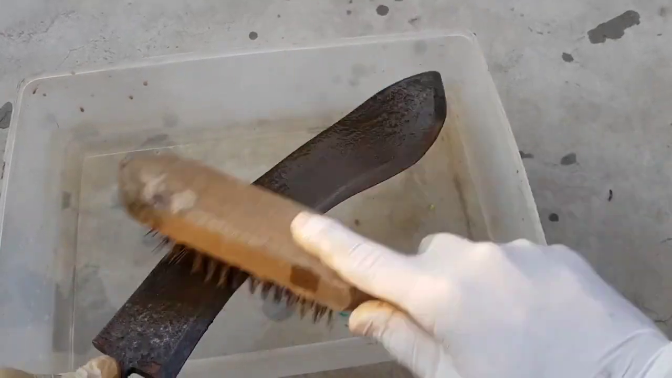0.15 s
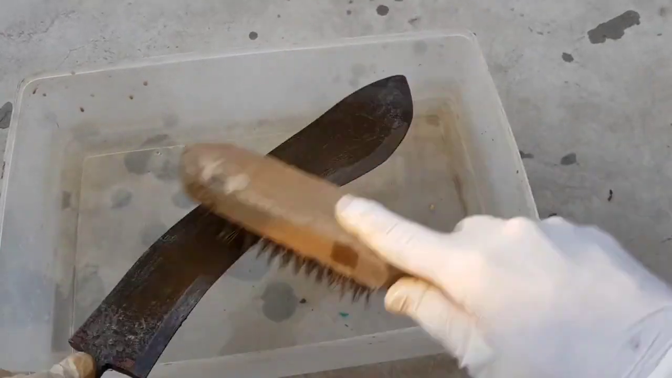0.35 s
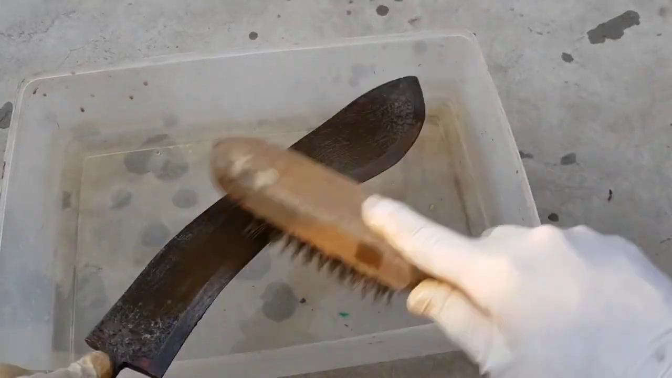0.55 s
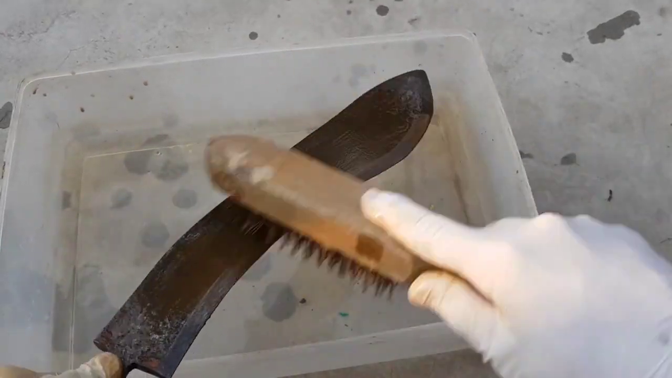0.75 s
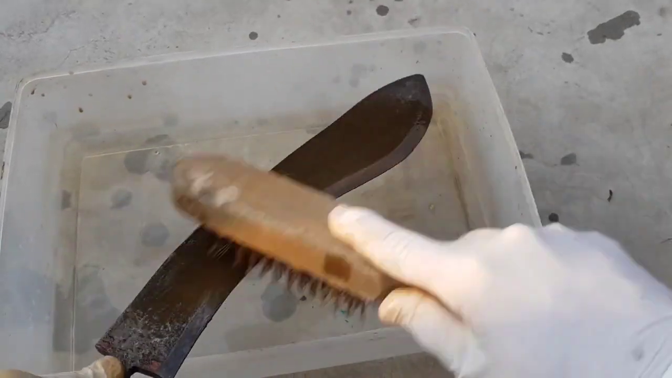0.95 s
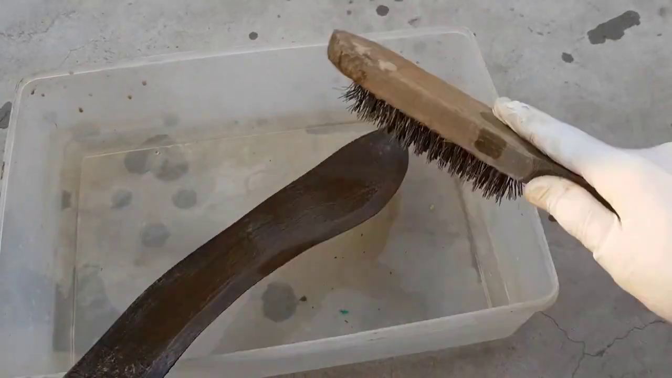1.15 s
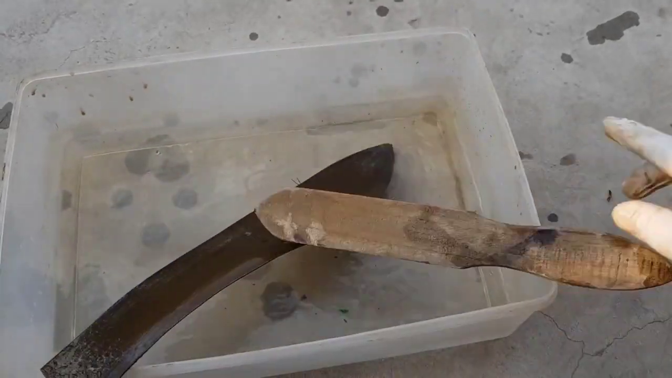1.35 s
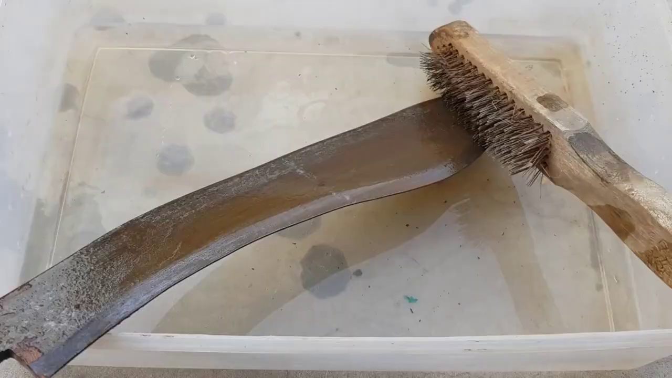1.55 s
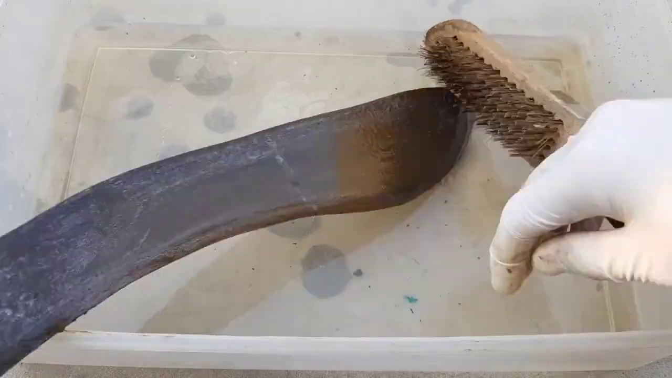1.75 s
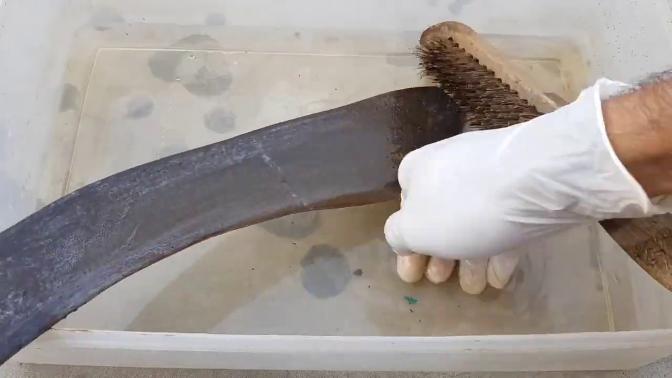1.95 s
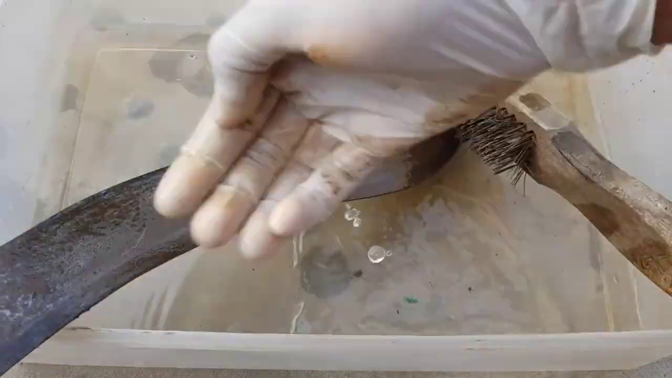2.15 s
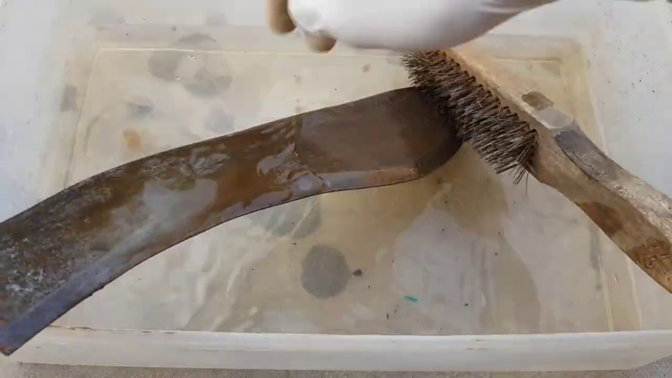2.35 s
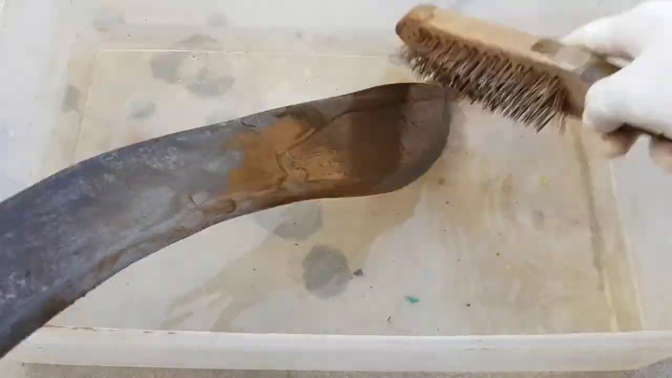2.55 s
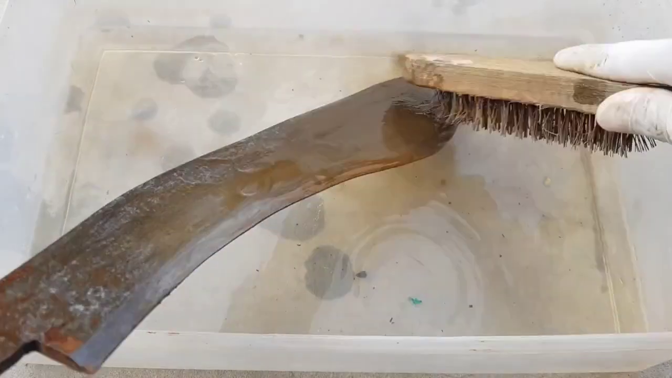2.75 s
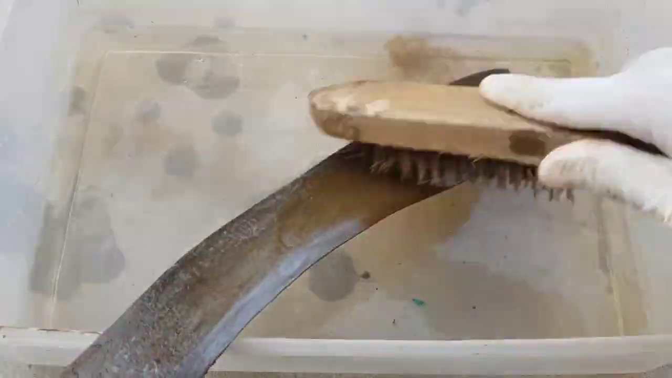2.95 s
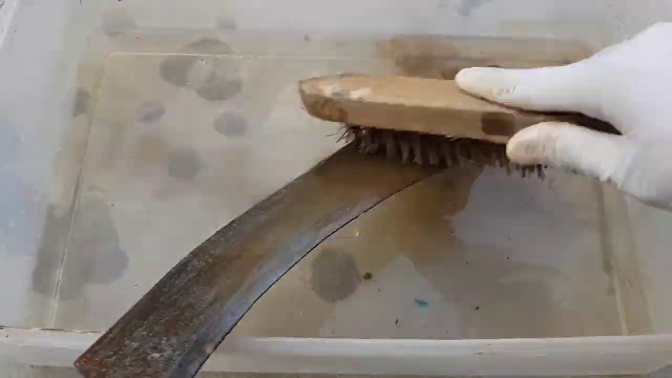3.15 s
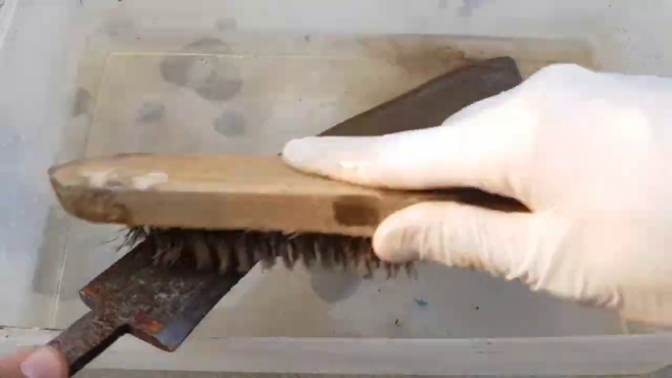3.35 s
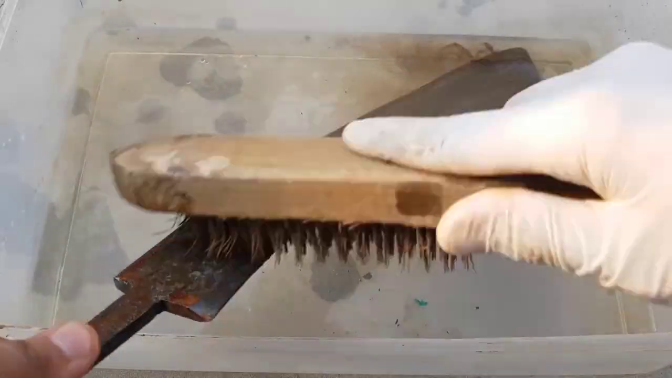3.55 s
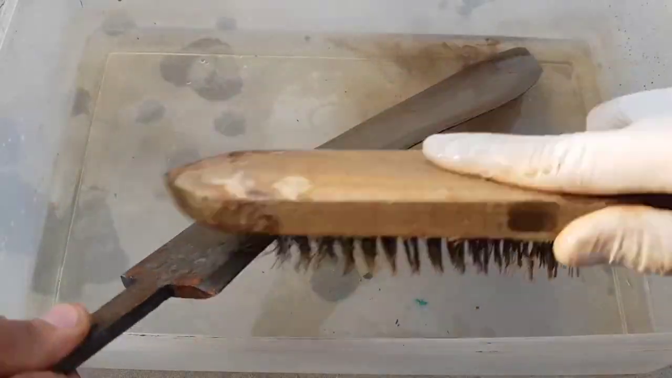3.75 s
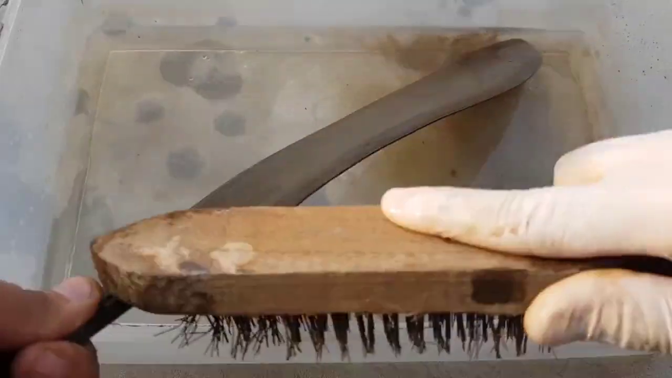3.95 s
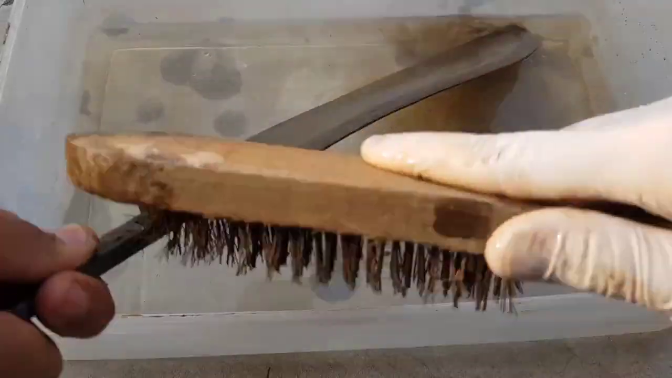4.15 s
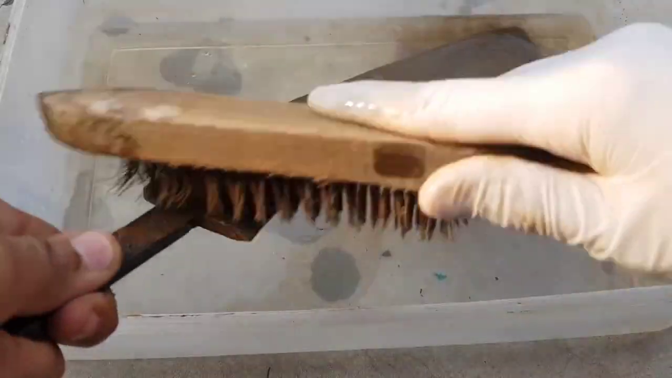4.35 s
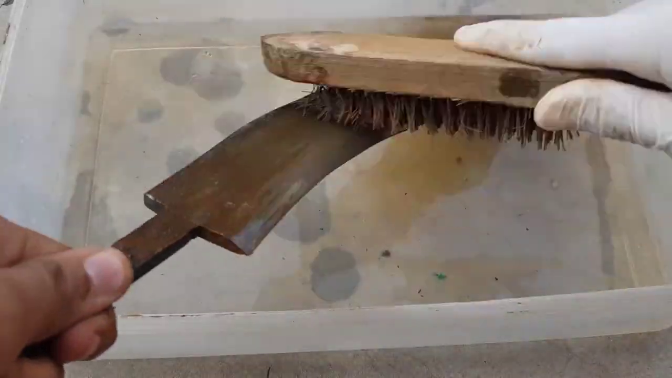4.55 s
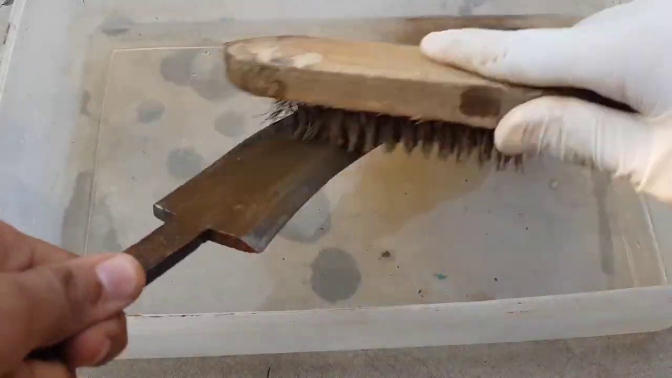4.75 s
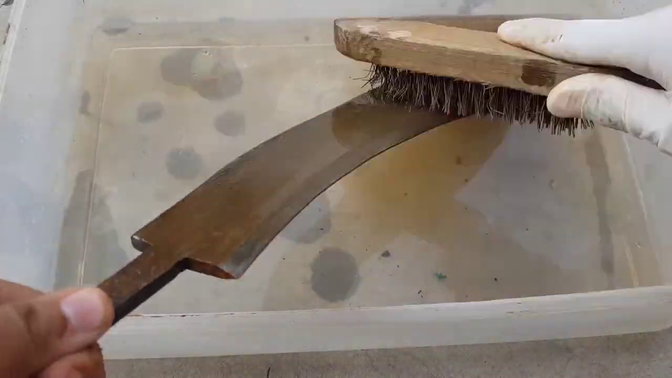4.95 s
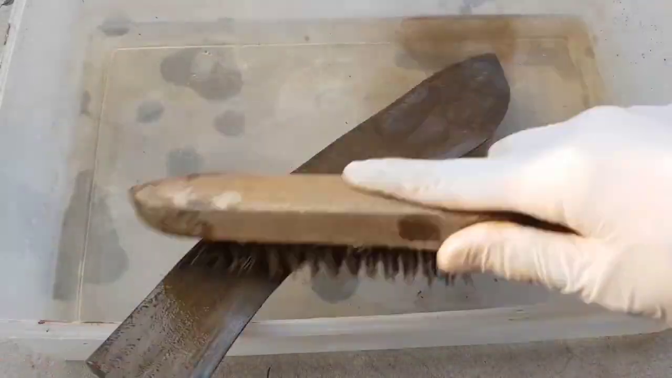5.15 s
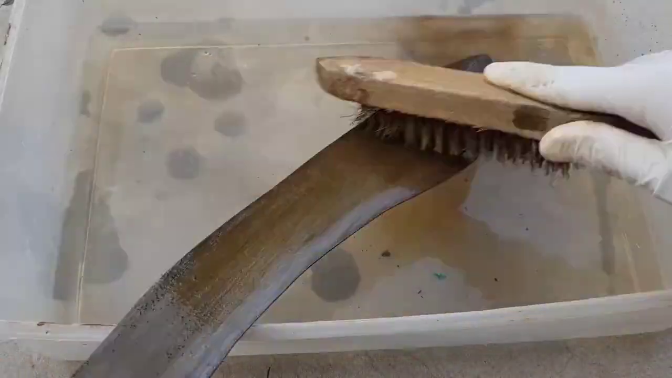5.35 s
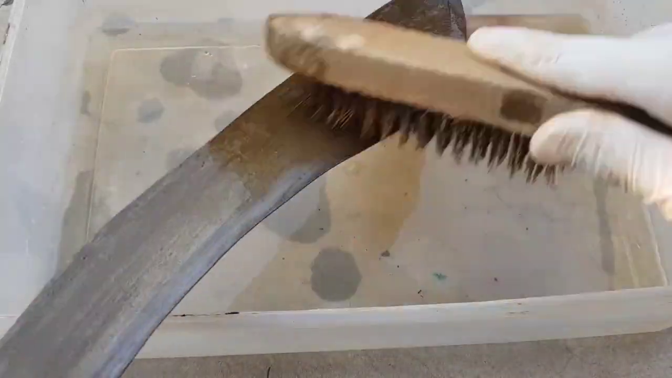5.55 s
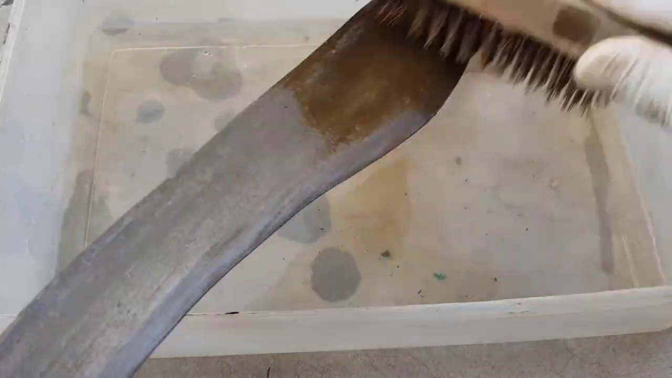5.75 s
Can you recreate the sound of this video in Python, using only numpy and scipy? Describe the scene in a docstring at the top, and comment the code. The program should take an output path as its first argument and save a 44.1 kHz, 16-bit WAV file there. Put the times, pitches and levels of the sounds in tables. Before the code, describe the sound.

Close stereo sound of a steel wire brush scrubbing a rusty blade resting in a plastic tub. Quick rasping strokes run for just over a second, then the brush is put down with hollow knocks. A quiet pause holds soft glove rustles and a barely audible water trickle. Scrubbing resumes, breaks briefly for rustles and knocks near four seconds, then carries on to the end over a faint low murmur.

```python
"""A steel wire brush scrubs a wet rusty blade whose tip rests in a plastic tub, close to a stereo microphone.
First come quick strokes: wire tips tick over rust and ring the blade; pressure rumbles in the tub.
In a pause the brush is laid down, a gloved hand wets the blade with a faint trickle, the brush is taken up.
It scrubs again, rustles and knocks through a short pause, and scrubs to the end.
Ticks are random clicks, blade and tub are ringing modes; a low murmur of filtered noise lies below."""
import sys
import numpy as np
from scipy import signal
from scipy.fft import rfft, irfft, next_fast_len
from scipy.io import wavfile
from scipy.ndimage import uniform_filter1d

SR = 44100
rng = np.random.default_rng(int(sys.argv[2]) if len(sys.argv) > 2 else 0)


def unload_wav(signal):
    """Save mono or channel-first audio to the path in sys.argv[1] as 16-bit WAV at rate SR, clipped to [-1, 1]."""
    wavfile.write(
        sys.argv[1],
        SR,
        np.round(np.clip(np.atleast_2d(signal).T, -1, 1) * 32767).astype(np.int16),
    )


N = 259749

# How the blade is held:
# (t/s, blade ring against scrape/dB, centre of the rub/Hz, coarse grit/dB, dry scratch/dB)
GRIP_OVER_TIME = [(.5, -46, 1040, -20, 2.5), (1.18, -39, 880, -35, -3), (1.25, -10.5, 633, 16.5, 2),
                  (2.0, -12.5, 814, 3.5, 5.5), (2.7, -12, 484, 7, 0.5), (3.9, -10, 560, 3.5, 4),
                  (4.02, -16, 593, 10.5, 2), (4.21, -27, 560, 12, -3), (4.35, -12.5, 600, 5.5, 0),
                  (5.0, -11, 746, -2.5, 4), (5.25, -25, 442, -2.5, -4), (5.5, 1, 680, 15, 7)]


def from_db(db):
    """Turn decibels into gain."""
    return 10 ** (np.asarray(db) / 20)


def rms_one(x):
    """Scale a sound to an rms level of 1."""
    return x / np.sqrt(np.mean(x ** 2) + 1e-20)


def in_time(rows):
    """Draw each column of a table as a curve over time, with straight lines between its rows."""
    s, *columns = np.transpose(rows)
    return [np.interp(np.arange(N) / SR, s, column) for column in columns]


def at_hz(points, hz):
    """Read a level from a spectrum table, with frequency on a log axis."""
    table_hz, table_db = np.array(points)[:, 0], np.array(points)[:, 1]
    return np.interp(np.log(hz), np.log(table_hz), table_db)


def drift(rate):
    """A slow random curve of rms 1; a higher rate makes it wander faster."""
    # computed at every 20th sample, after a run-in that is thrown away
    r = np.exp(-40 * np.pi * rate / SR)
    noise = rng.standard_normal(N // 20 + 2002)
    slow = rms_one(signal.lfilter([1], [1, -2 * r, r * r], noise)[2000:])
    return np.interp(np.arange(N) / 20, np.arange(len(slow)), slow)


def ring(x, hz, t60):
    """A unit click sets off a sine of height 1 that dies by 60 dB in t60 seconds."""
    r = from_db(-60 / (t60 * SR))
    w = 2 * np.pi * hz / SR
    return signal.lfilter([0, np.sin(w)], [1, -2 * r * np.cos(w), r * r], x + 1e-18)


def ticks(per_s, spread_db):
    """Random contacts of uneven size; mid and side share the moments, not the wave."""
    happens = rng.random(N) < per_s / SR
    sizes = from_db(spread_db * np.minimum(rng.exponential(1, N), 4))
    return rms_one(sizes * happens * rng.standard_normal((2, N)))


def coloured(sources, spectrum, patchy_db, rate):
    """Quarter-octave bands, each with its own flicker; neighbours are fed by unrelated sources."""
    lowest, highest = spectrum[0][0], spectrum[-1][0]
    edges = np.geomspace(lowest, highest, round(4 * np.log2(highest / lowest)))
    out = 0
    for k, (low, high) in enumerate(zip(edges, edges[1:])):
        band_filter = signal.butter(2, [low, high], "band", fs=SR, output="sos")
        band = signal.sosfilt(band_filter, sources[k % 2])
        level_db = at_hz(spectrum, np.sqrt(low * high))
        out = out + band * from_db(level_db + patchy_db * drift(rate))
    return rms_one(out)


def blows(events):
    """Place one click for each event, given as (s, dB)."""
    clicks = np.zeros(N)
    clicks[[round(e[0] * SR) for e in events]] = from_db([e[1] for e in events])
    return clicks


def brush(rust, wires):
    """Dense ticks: a duller scrape over the rust, a bright hiss of wire tips, the ring of the blade."""
    # colour of the scrape over rust: (f/Hz, level per Hz/dB)
    rust_colour = [(900, -54.5), (1600, -14), (2600, -7.5), (3300, -7), (4400, -0.5), (6300, 5.5),
                   (8000, -23.5)]
    # colour of the wire-tip hiss: (f/Hz, level per Hz/dB)
    wire_colour = [(4500, -77), (6500, -2), (8300, 8), (10800, 4.5), (16000, 9)]
    # ringing tones of the blade: (f/Hz, width/Hz, level/dB)
    blade_tones = [(4840, 130, 0), (5060, 200, -1), (8150, 200, -1), (9400, 250, -4), (12500, 250, -3),
                   (14100, 250, -2)]
    ring_db, _, grit_db, scratch_db = in_time(GRIP_OVER_TIME)
    tufts = from_db(1.3 * drift(45))   # tufts catch and let go together
    tips = [ticks(18000, spread_db=1.8) for _ in range(2)]

    scrape = coloured(tips, rust_colour, patchy_db=2.2, rate=20)
    coarse = signal.sosfilt(signal.butter(2, 2400, fs=SR, output="sos"), scrape)
    scratch = signal.sosfilt(signal.butter(2, [2500, 4200], "band", fs=SR, output="sos"), scrape)
    scrape = scrape + (from_db(grit_db) - 1) * coarse + (from_db(scratch_db) - 1) * scratch

    hiss = wires * coloured(tips, wire_colour, patchy_db=2.3, rate=30)

    blade = 0
    for hz, width, db in blade_tones:
        t60 = np.log(1000) / np.pi / width   # a wider tone dies sooner
        tone = rms_one(ring(tips[0], hz, t60))
        blade = blade + from_db(db + 3.5 * drift(25)) * tone
    return tufts * (rust * (scrape + from_db(ring_db) * blade) + hiss)


def strokes():
    """Gains of rust, wires and tub load: each stroke swells from its turn and slows to the next."""
    # back-and-forth strokes: (push start t/s, pull start t/s, push level/dB, pull level/dB,
    # load on tub/dB, dip before the push/dB)
    back_and_forth = [(-.05, 0.002, -36, -25, -35, 17), (0.096, 0.158, -24.5, -29, -47, 16),
                      (0.189, 0.275, -26.5, -28.5, -45, 8), (0.283, 0.391, -26.5, -26, -52, 11),
                      (0.41, 0.483, -29.5, -33.5, -55, 5), (0.541, 0.608, -32, -27.5, -48.5, 0),
                      (0.614, 0.681, -25, -29, -47.5, 41), (0.722, 0.775, -24.5, -27.5, -46.5, 15),
                      (0.827, 0.913, -30.5, -28.5, -46, -0.5), (0.916, 0.977, -26, -27, -52.5, 19),
                      (1.019, 1.072, -24.5, -29, -49.5, 17), (1.137, 1.173, -31, -35, -52.5, -2),
                      (2.759, 2.87, -31, -26.5, -65, 34), (2.883, 2.934, -33, -34, -84, 5),
                      (2.96, 3.06, -33.5, -27, -47, 2.5), (3.023, 3.105, -34.5, -28, -37, 7.5),
                      (3.133, 3.216, -29.5, -25, -55, 17), (3.246, 3.321, -31.5, -26, -64, 7),
                      (3.371, 3.447, -33.5, -32.5, -61, 3.5), (3.494, 3.556, -31, -32, -54, 12),
                      (3.603, 3.67, -34, -29.5, -50.5, 0.5), (3.69, 3.757, -33.5, -26, -54, 5.5),
                      (3.754, 3.842, -39, -37.5, -62.5, -3), (3.878, 3.914, -32, -35.5, -65, 8),
                      (3.961, 4.031, -32, -45.5, -46, 6), (4.332, 4.335, -43, -34.5, -38.5, 0),
                      (4.382, 4.425, -30, -29.5, -44.5, 14), (4.468, 4.515, -29, -29.5, -46, 11),
                      (4.547, 4.626, -31, -27, -55.5, 5.5), (4.644, 4.704, -28, -28.5, -62, 24),
                      (4.736, 4.8, -29.5, -30.5, -52.5, 9), (4.834, 4.894, -31.5, -26.5, -59.5, 7),
                      (4.929, 5.005, -30.5, -30, -68, 7), (5.055, 5.108, -24.5, -31.5, -52.5, 6.5),
                      (5.192, 5.254, -36, -33.5, -54, -2), (5.313, 5.415, -32, -35.5, -51.5, 19),
                      (5.445, 5.53, -37.5, -37, -58, 3), (5.6, 5.653, -32.5, -34.5, -59.5, 12),
                      (5.713, 5.761, -28, -32, -63, 15), (5.82, 5.871, -26, -32, -52, 18)]
    # how the brush is angled: (t/s, wires over blade on a push/dB, share of a push spent speeding up [0-1],
    # share of a pull spent speeding up [0-1], dip before a pull/dB)
    angle = np.array([(0, 9.9, 0.45, 0.077, 7.3), (0.999, 11.9, 0.58, 0.79, 5.1),
                      (1.199, 11, 0.68, 0.22, 4.2), (2.803, 13, 0.34, 0.42, 6.5), (3.0, 3.7, 0.9, 0.13, 5),
                      (3.25, 7.1, 0.53, 0.26, 9.7), (3.5, 5.8, 0.69, 0.066, 10.5),
                      (3.7, 6.8, 0.65, 0.063, 26), (3.998, 0.87, 0.94, 0.18, 4.9),
                      (4.4, 2.1, 0.83, 0.67, 7.2), (4.7, 5.8, 0.65, 0.076, 8.9), (5.0, 7.3, 0.47, 0.1, 8.7),
                      (5.4, 7.2, 0.25, 0.13, 2.4), (5.75, 21.7, 0.32, 0.26, 8.9)])
    pull_wires_db, pull_load_db = 3.5, -21.5   # a pull is brighter and leans less on the tub
    lift_s, lift_db = 0.028, 30   # the last pull before a pause lasts this long and fades this far
    t, (rust, wires, load) = np.arange(N) / SR, np.zeros((3, N))

    # one row per stroke: turn s, share speeding up, level at the turn dB, level at speed dB, wires dB, load dB
    single = []
    for push, pull, push_db, pull_db, load_db, dip_db in back_and_forth:
        wires_db, push_up, pull_up, pull_dip_db = (
            np.interp(pull, angle[:, 0], column) for column in angle.T[1:])
        single.append((push, push_up, push_db - dip_db, push_db, wires_db, load_db))
        single.append((pull, pull_up, pull_db - pull_dip_db, pull_db,
                       wires_db + pull_wires_db, load_db + pull_load_db))

    following = single[1:] + [(np.inf,)]
    for (turn, speed_up, turn_db, speed_db, wires_db, load_db), after in zip(single, following):
        if after[0] - turn > .2:   # a pause follows
            end, end_db = turn + lift_s, speed_db - lift_db
        else:
            end, end_db = after[0], after[2]
        fastest = turn + np.clip(speed_up, .02, .95) * (end - turn)
        now = (t >= turn) & (t < end)
        swing = np.sin(np.interp(t[now], [turn, fastest, end], [0, np.pi / 2, np.pi]))
        rest = from_db(np.where(t[now] < fastest, turn_db, end_db))
        speed = rest + (from_db(speed_db) - rest) * swing
        share = 1 / np.sqrt(1 + from_db(2 * wires_db))   # rust and wires share the power
        rust[now] = speed * share
        wires[now] = speed * share * from_db(wires_db)
        load[now] = from_db(load_db) * (.15 + swing ** 2)
    return np.array([rust, wires, load])


def handling():
    """The same three gains for each rustle: it swells, runs unevenly and trails off."""
    # rustles of brush, glove and water in the pauses: (start t/s, loudest t/s, end t/s,
    # level/dB, treble over middle/dB, load on tub/dB)
    rustles = [(1.255, 1.268, 1.36, -48, -1, -43), (1.355, 1.395, 1.455, -49, 2.5, -39),
               (1.455, 1.49, 1.607, -50, 6.5, -60), (1.563, 1.572, 1.61, -62, -10, -47),
               (1.742, 1.77, 1.86, -62, -2.5, -62), (1.815, 1.83, 1.866, -58, -8, -56),
               (1.915, 1.94, 2.1, -46, -5, -65), (2.048, 2.09, 2.164, -56, -3, -60.5),
               (2.255, 2.303, 2.365, -64, 11, -74), (2.4, 2.48, 2.58, -76, -10, -72),
               (2.54, 2.6, 2.72, -57, -5, -66), (3.968, 4.02, 4.1, -50, -4, -59),
               (4.122, 4.13, 4.165, -35, -2.5, -42), (4.16, 4.185, 4.222, -36.5, -4.5, -40),
               (4.232, 4.243, 4.259, -48.5, 2, -70)]
    t, gains = np.arange(N) / SR, np.zeros((3, N))
    for start, loudest, end, rustle_db, treble_db, load_db in rustles:
        swing = np.sin(np.interp(t, [start, loudest, end], [0, np.pi / 2, np.pi])) ** 2
        gains += swing * from_db([[rustle_db], [rustle_db + treble_db], [load_db]])
    trail = np.exp(-1 / (0.0098 * SR))   # smooths over 9.8 ms
    uneven = from_db([2.2 * drift(35) for _ in gains])
    return uneven * signal.lfilter([1 - trail], [1, -trail], gains)


def snaps():
    """Each snap is a burst a millisecond or two long with a short spray of neighbouring wires."""
    # single wires catch and snap free, and near 2.49 s a drop of water splashes: (t/s, level/dB)
    snap_times = [(0.1311, -10.5), (0.246, -16), (0.553, -22.5), (1.2569, -19.5), (1.3796, -27.5),
                  (1.488, -29.5), (1.6974, -44.5), (1.9263, -36.5), (2.0885, -22.5), (2.494, -46.5),
                  (2.585, -43), (2.616, -51), (2.63, -37), (2.637, -32), (2.7523, -35.5), (4.126, -24),
                  (4.153, -22.5), (4.2458, -32), (4.3069, -18.5), (4.394, -21), (4.944, -17),
                  (5.181, -23.5), (5.8317, -10), (5.8354, -14), (5.8424, -18)]
    t = np.arange(2000) / SR
    crack = np.exp(-t / .0016)
    spray = 0.55 * np.exp(-t / 0.0062)
    burst = np.convolve(blows(snap_times), crack + spray)[:N]
    bright = signal.butter(2, [4300, 15000], "band", fs=SR, output="sos")
    return from_db(-3.5) * signal.sosfilt(bright, burst * rng.choice([-1, 1], (2, N)))


def tub(load):
    """Knocks, slips and the coarse rub of the blade tip strike the same modes; strengths vary by chance."""
    # ringing modes of the tub: (f/Hz, level/dB, t60/s)
    modes = [(145, -32, 0.18), (218.8, -17, 0.086), (345, -6, 0.032), (477, 0.5, 0.029), (637, 0.5, 0.028),
             (747, 1, 0.024), (935, 6.5, 0.01), (1184, 3, 0.02), (1564, 10.5, 0.0065), (1670, 4, 0.028),
             (1847, -1, 0.021), (2320, 8.5, 0.0088), (2645, -4, 0.041), (2730, -9.5, 0.022),
             (3440, -4, 0.014)]
    # brush back and blade knock the tub:
    # (t/s, level/dB, hardness in dB per octave, favoured pitch of the spot struck f/Hz)
    knock_rows = [(0.874, -34, -0.5, 2460), (1.258, -22, 0.5, 627), (1.287, -41.5, 6, 677),
                  (1.346, -36.5, -3, 2160), (1.378, -21.5, -2.5, 654), (1.403, -35, 1.5, 2270),
                  (1.4149, -26, -1.5, 1610), (1.462, -36, -0.5, 1620), (1.564, -25.5, -5, 537),
                  (1.768, -41.5, -6.5, 524), (1.971, -41, -0.5, 680), (2.1, -33, -2, 506),
                  (2.191, -75, 3.5, 2400), (2.291, -52, -19, 393), (2.589, -45, -1, 944),
                  (2.65, -33, 0, 840), (2.834, -36, -10, 402), (3.005, -33, -0.5, 530),
                  (3.07, -51.5, -13, 537), (3.918, -47.5, 0, 1470), (4.005, -32.5, -3, 820),
                  (4.129, -34.5, -9, 650), (4.174, -33, -10, 490), (4.31, -25.5, -4.5, 534),
                  (4.395, -40.5, -3, 640), (4.414, -42.5, 1, 630), (4.521, -40.5, -3, 720),
                  (4.768, -46, 2, 910), (4.882, -36, -5.5, 694), (4.977, -38, -1, 715),
                  (5.222, -33, 0.5, 463)]
    # the blade edge drags in uneven slips: (start t/s, end t/s, level/dB, favoured pitch f/Hz)
    drags = [(4.012, 4.04, -47, 1720), (4.13, 4.16, -51.5, 2650), (4.181, 4.212, -44.5, 2150)]
    favour_db, favour_octaves = 8.5, 0.3   # lift and reach of the favoured pitch
    slips_per_drag, slip_spread_db = 6, 3

    when = rng.random((len(drags), slips_per_drag))
    size = rng.normal(0, slip_spread_db, (len(drags), slips_per_drag))
    slips = []
    for r, (start, end, db, hz) in enumerate(drags):
        for k in range(slips_per_drag):
            moment = start + (k + when[r, k]) / slips_per_drag * (end - start)
            slips.append((moment, db + size[r, k], 0, hz))
    knocks = np.array(knock_rows + slips)
    knock_s, knock_db, hardness, favoured_hz = knocks.T

    luck = rng.normal(0, 2.5, (len(knocks), len(modes)))   # dB
    rub = ticks(1500, spread_db=3) * load
    rub_centre_hz = in_time(GRIP_OVER_TIME)[1]
    # a knock chatters on for a few milliseconds
    rattle = np.exp(-np.arange(1500) / SR / .008)
    chatter = ticks(2500, spread_db=4)
    out = np.zeros((2, N))
    for k, (hz, db, t60) in enumerate(modes):
        hard_db = hardness * np.maximum(np.log2(hz / 600), -1.5)
        favoured = favour_db * np.exp(-(np.log2(hz / favoured_hz) / favour_octaves) ** 2)
        struck_db = knock_db + hard_db + favoured + db - 6 + luck[:, k]
        struck = blows(np.c_[knock_s, struck_db])
        chattering = 0.027 * chatter * signal.fftconvolve(struck, rattle)[:N]
        struck = struck * [[1], [0.8 * (-1) ** k]] + chattering

        off_centre = np.log2(hz / rub_centre_hz)   # octaves; above the centre the rub fades faster
        loss_db = np.where(off_centre > 0, 12., 5.) * np.minimum(off_centre ** 2, 1.5)
        rubbed = rub * from_db(db - loss_db + 2.5 * drift(20))
        out += ring(struck + from_db(-18.5) * rubbed, hz, t60) * (-1) ** k
    return out


def trickle():
    """Water running off the glove sings on one faint, unsteady pitch."""
    # pitch and loudness of the water: (t/s, f/Hz, level/dB)
    water = [(2.38, 1000, -110), (2.4, 1050, -70), (2.425, 1200, -64), (2.46, 1230, -78), (2.52, 1240, -62),
             (2.555, 1180, -71), (2.58, 1150, -110)]
    hz, db = in_time(water)
    unsteady_hz = hz * (1 + .022 * drift(60))
    tone = np.sin(2 * np.pi * np.cumsum(unsteady_hz) / SR)
    return (db > -100) * from_db(db) * from_db(3 * drift(40)) * tone


def stereo(mid_side):
    """Mix mid and side to the likeness that each frequency has at the two microphones."""
    # how alike left and right are: (f/Hz, likeness [0-1])
    likeness = [(60, 1), (300, 0.98), (1000, 0.92), (3800, 0.58), (10000, 0.014)]
    size = next_fast_len(N)
    alike = np.clip(at_hz(likeness, np.arange(1, size // 2 + 2) * SR / size), 0, 1)
    mid, side = rfft(mid_side, size) * np.sqrt([1 + alike, 1 - alike]) / np.sqrt(2)
    return irfft(np.array([mid + side, mid - side]), size)[:, :N]


def room(x):
    """Short diffuse return from the tub walls and the floor: a fading noise tail."""
    room_db, room_t60_s = -14.5, .16
    t = np.arange(SR // 4) / SR
    noise = rms_one(rng.standard_normal((2, len(t))))
    tail = noise * from_db(-60 * t / room_t60_s) * (t > .004)   # starts after 4 ms
    tail = tail / np.sqrt(np.sum(tail ** 2, axis=1, keepdims=True))
    return x + from_db(room_db) * signal.fftconvolve(x, tail, axes=1)[:, :N]


def background():
    """Distant low murmur of filtered noise with a narrow ringing drone in it."""
    # colour of the murmur: (f/Hz, level per Hz/dB)
    air_colour = [(40, -41), (80, -16.5), (160, -11), (280, -7), (335, 1), (430, -7.5), (560, -35),
                  (800, -17.5), (2800, -34.5), (5000, -24), (16000, -54)]
    # loudness of the low background: (t/s, level/dB)
    low_level = [(0, -72), (.11, -54.5), (.5, -61), (.57, -44.5), (.7, -53), (1.55, -54), (1.63, -65.5),
                 (2.7, -67), (5.9, -66)]
    murmur = coloured(rng.standard_normal((2, 2, N)), air_colour, patchy_db=2.2, rate=12)
    drone = rms_one(ring(rng.standard_normal((2, N)), hz=323, t60=0.18))
    return from_db(in_time(low_level)[0]) * (murmur + from_db(-7.5) * drone)


def scene():
    """Put all sources together; the tub sounds more to the left than the brush."""
    rust, wires, load = strokes() + handling()
    # gains in the order left, right
    bright = stereo(brush(rust, wires) + snaps()) * from_db([[.6], [-.6]])
    low = stereo(tub(uniform_filter1d(load, size=300))) * from_db([[1.5], [-1.5]])
    return room(from_db(-0.5) * bright + low + trickle()) + stereo(background())


def record(dry):
    """The microphone drops the deep bass; the top is cut steeply."""
    cutoff_hz = 16050   # from here up the sound is at least 60 dB down
    thin = signal.sosfilt(signal.butter(2, 70, "high", fs=SR, output="sos"), dry)
    return signal.sosfilt(signal.cheby2(20, 60, cutoff_hz, fs=SR, output="sos"), thin)


dry = scene()
out = record(dry)
unload_wav(out)
```